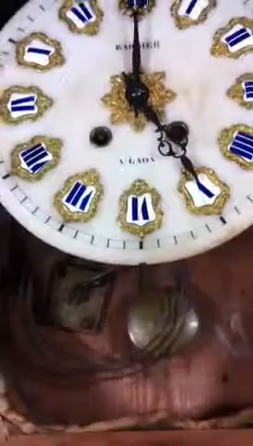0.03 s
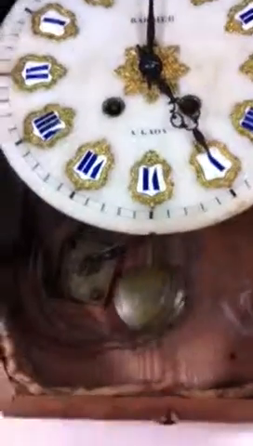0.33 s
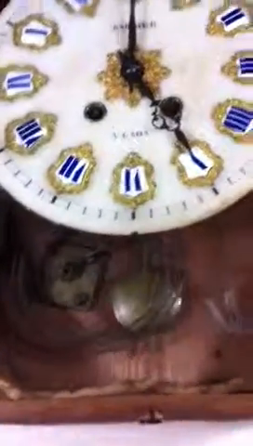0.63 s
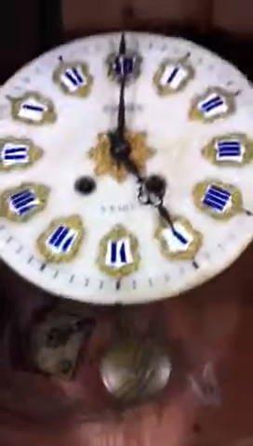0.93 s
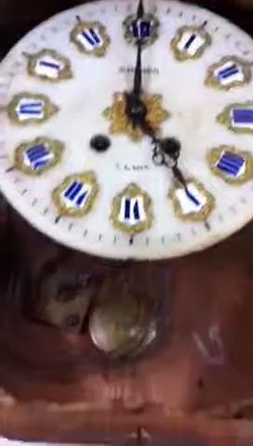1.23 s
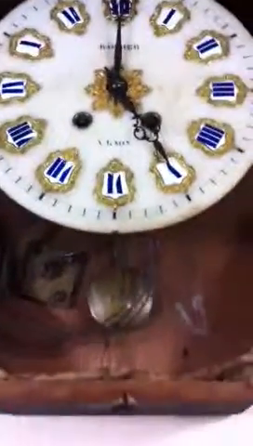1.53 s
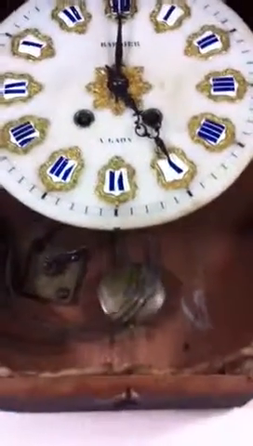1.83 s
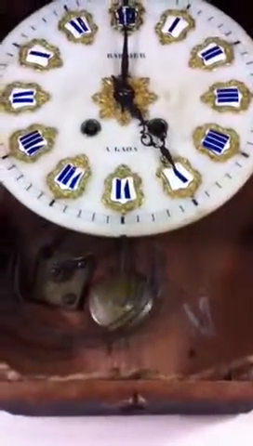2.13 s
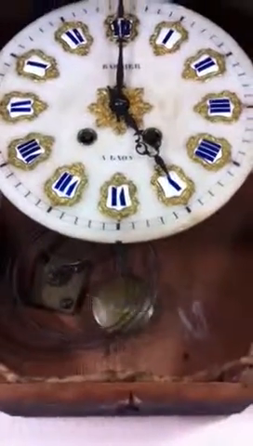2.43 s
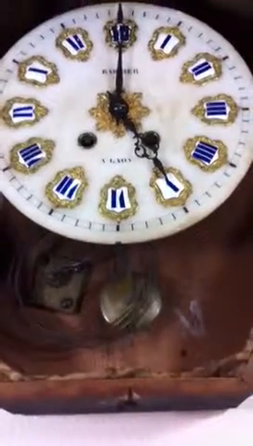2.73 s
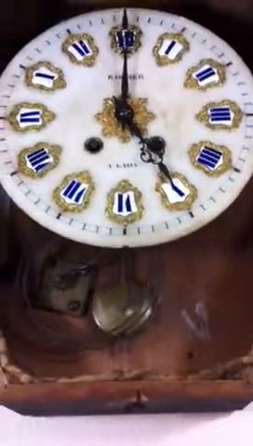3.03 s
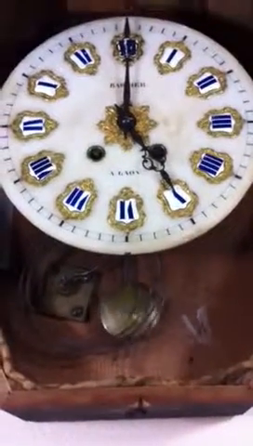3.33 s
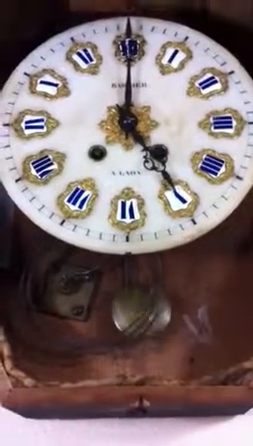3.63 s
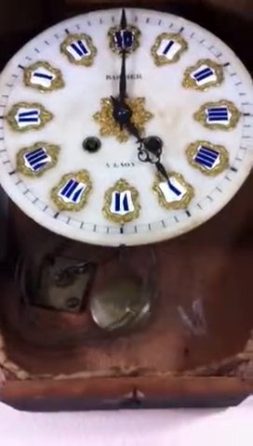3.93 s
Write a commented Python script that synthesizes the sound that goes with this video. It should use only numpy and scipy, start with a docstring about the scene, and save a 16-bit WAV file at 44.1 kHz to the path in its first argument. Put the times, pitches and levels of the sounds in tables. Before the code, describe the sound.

An antique wall clock strikes the hour close to the microphone in a quiet room. Its wire gong is already ringing, then three more evenly spaced blows land and ring on, with faint mechanism clicks between them.

```python
"""A coiled wire gong is already ringing: an antique wall clock is striking the hour in a quiet room,
close to a single microphone. Three more hammer blows land, each with a crack and a knock of the
wooden case, and the coil rings in close pairs of modes that beat. The strike train clicks faintly
between blows. Behind the clock lie a few soft rustles, a low room rumble and a hiss."""
import sys
import numpy as np
from scipy import signal
from scipy.fft import rfft, irfft
from scipy.io import wavfile

SR = 44100
rng = np.random.default_rng(int(sys.argv[2]) if len(sys.argv) > 2 else 0)


def transcribe(u):
    """Save the signal u as a 16-bit wav file named by the first command-line argument.

    u: samples, shape (n,) or (channels, n), limited to [-1, 1]; the rate is SR.
    q: integer samples, one column per channel.
    """
    v = np.clip(np.atleast_2d(u).T, -1, 1)
    q = np.round(v * 32767).astype(np.int16)
    wavfile.write(sys.argv[1], SR, q)


N = 176400
T = np.arange(N) / SR

# spectra of the room's rumble and hiss: f/Hz, relative level/dB
RUMBLE_SPECTRUM = [(25,-42),(45,-42),(62,-33),(80,-20),(100,-7),(122,0),(148,-1),(168,-12),(210,-18),(400,-30),(1000,-60)]
HISS_SPECTRUM = [(60,-30),(200,-1),(450,1),(800,-2),(1200,-5),(2000,-13.5),(3200,-18.5),(6000,-21),(9000,-23),(11000,-22.5),(12700,-18.5),(14000,-23),(15700,-23.5)]
RUMBLE_DB, RUMBLE_WAVER_DB, HISS_DB = -57.8, .8, -58.5
# spectrum of a faint hiss that swells with each blow and fades: f/Hz, relative level/dB
BLOW_HISS_SPECTRUM = [(300,-12),(900,0),(1700,-2),(2400,-8),(3100,-10),(3800,-19),(6000,-21),(10500,-28),(12600,-17),(14500,-28)]
BLOW_HISS_DB, BLOW_HISS_T60_S = -57, 2.6
# soft rustles and dull bumps: middle t/s, half length/s, centre f/Hz, level/dB
RUSTLE_SWELLS = [(.01,.05,4700,-67),(.27,.08,5300,-70),(.15,.12,450,-57),(.08,.12,1800,-65),(1.64,.05,520,-56),(1.62,.07,2300,-66),
                 (1.73,.08,135,-53),(3.33,.04,140,-53),(3.80,.03,2000,-67)]
RUSTLE_OCTAVES, RUSTLE_SKIRT_DB = .25, 8  # half width; extra fall one octave out

# clicks of the strike train and escapement: t/s, body level/dB, metal level/dB, metal t60/s
TRAIN_CLICKS = [(.392,-53,-68,.05),(.792,-40.5,-53,.055),(.875,-53,-69,.06),(1.026,-57,-66,.06),(1.80,-56,-65,.05),(2.095,-61,-71,.06),
                (2.415,-45,-58.5,.2),(2.508,-46,-61.5,.06),(3.552,-62,-69,.15),(3.992,-47,-54,.06)]
# spectra of a click's hollow body and metallic edge: f/Hz, relative level/dB
CLICK_BODY_SPECTRUM = [(300,-25),(750,-14),(900,-4),(1110,0),(1250,-14),(2200,-20),(3500,-35)]
CLICK_METAL_SPECTRUM = [(2000,-12),(3800,-9),(4900,-2),(5400,-3),(5850,7),(6500,-5),(8000,-9),(10000,-6),(15500,-12)]
CLICK_BODY_T60_S, CLICK_ATTACK_S = .13, .002

# hammer blows: t/s, gain/dB, treble gain/dB, then gain/dB in each of ZONES_HZ, set by the contact point
HAMMER_BLOWS = [(-1.0, -1.5, 5, 6.5, 11, -9, -7), (.691, -.3, 4, 3, 3.5, -2.5, -5),
                (2.328, .3, -3, -4, -4.5, 2, 7), (3.890, -.5, -.5, -4.5, -5, 3, -1)]
ZONES_HZ, ZONE_OCTAVES = (755, 1072, 1230, 2850), .08
TREBLE_FROM_HZ, TREBLE_FULL_HZ = 1950, 2150
CONTACT_S = .006  # the hammer stops the old ring as it starts the new
# spectrum of the hammer's metallic crack: f/Hz, relative level/dB
CRACK_SPECTRUM = [(800,-10),(2000,0),(3200,-2),(3550,-6),(3780,4),(4000,1),(4250,-8),(6000,-4),(7000,-7),(9500,-13),(12000,-8),(13500,-14),(15500,-18)]
CRACK_DB, CRACK_HOLD_S, CRACK_T60_S = -47, .006, .045
# spectrum of the wooden case under a blow: f/Hz, relative level/dB
CASE_SPECTRUM = [(100,-32),(220,-11),(400,-4),(540,1),(720,-5),(900,4),(1000,-3),(1120,-2),(1250,-6),(1500,-3),(1850,-6),(2150,-13),(3000,-19),(4500,-33),(9000,-45)]
CASE_DB, CASE_T60_S = -36.8, .12
ROOM_DB, ROOM_T60_S = -49, .7  # the same knock lingering in case and room

# modes of the coil: f/Hz, level/dB before the blow's gains, t60/s
COIL_MODES = [(147.8,-54,9),(180.2,-56,8.8),(186.9,-57,12),(234.2,-54,2.7),(289.5,-49.5,7),(342.5,-61,5),(352.4,-55,3),(412.5,-50.5,6.6),
              (488,-45.5,6.5),(499.1,-50,1.8),(569.1,-44.5,3.1),(580.7,-46,3.8),(655.6,-39,2.7),(668.2,-50.3,6.1),(747.4,-49.7,5.6),(761.1,-57,4.7),
              (844,-52.5,9),(858.8,-50,7.1),(946.3,-58,9),(962.8,-37.8,7.3),(1054.8,-59,8),(1071.9,-48.5,5.4),(1167,-53,8),(1186,-49.5,10),
              (1283.6,-41,4),(1304.6,-45.3,3.5),(1407.1,-35.5,1.35),(1428.8,-45.5,6.9),(1533.7,-45,2.9),(1558.5,-49.6,7.2),(1665.1,-46.5,3.4),
              (1692.7,-53.5,5.9),(1800,-61.5,2.4),(1830.2,-61,4.4),(1940.5,-51,2.7),(1973.7,-55.5,5.4),(2086.4,-59.5,1.9),(2123,-55,2.9),(2237.8,-61,2.2),
              (2277.5,-64,4.2),(2394.4,-61,1.9),(2437.1,-60,3.5),(2554.7,-54,1.7),(2600.8,-57.5,2.5),(2718.9,-59,1.1),(2768.5,-58,1.8),
              (2887,-61,1),(2939.8,-63,2.2),(3115.9,-58,1.45),(3296,-65,.7),(4480,-70,.8)]
ZING_FROM_HZ, ZING_STEP_HZ, ZING_DB, ZING_FALL_DB_PER_MODE, ZING_T60_S = 3470, 108, -69, .6, .45


def amp(db):
    """Decibels to gain."""
    return 10 ** (np.asarray(db) / 20)


def noise(spectrum):
    """Noise of rms 1, shaped by points of f/Hz, relative level/dB."""
    hz, db = np.array(spectrum).T
    bins_hz = np.maximum(np.fft.rfftfreq(N, 1 / SR), 1)
    gain = amp(np.interp(np.log(bins_hz), np.log(hz), db))
    shaped = irfft(rfft(rng.standard_normal(N)) * gain, N)
    return shaped / shaped.std()


def ramp(start, length):
    """A straight rise from 0 to 1."""
    return np.clip((T - start) / length, 0, 1)


def ring(start, attack, t60, hold=0):
    """An envelope that rises, holds, then falls 60 dB in t60 seconds."""
    return ramp(start, attack) * np.exp(-np.log(1000) * np.maximum(T - start - attack - hold, 0) / t60)


def room_tone():
    """The quiet room behind the clock: a wavering low rumble and a steady hiss."""
    waver = noise([(1, 0), (5, 0), (15, -40), (60, -120)])
    rumble = amp(RUMBLE_DB + RUMBLE_WAVER_DB * waver) * noise(RUMBLE_SPECTRUM)
    return rumble + amp(HISS_DB) * noise(HISS_SPECTRUM)


def hiss_after_blows():
    """A faint hiss that swells with each blow and fades."""
    envelope = sum(amp(db) * ring(start, CONTACT_S, BLOW_HISS_T60_S) for start, db, *_ in HAMMER_BLOWS)
    return amp(BLOW_HISS_DB) * noise(BLOW_HISS_SPECTRUM) * envelope


def rustles():
    """Faint swells of narrow noise, like something brushing or shifting near the microphone."""
    octaves = np.linspace(-2, 2, 41)
    shape_db = -20 * np.log10(1 + (octaves / RUSTLE_OCTAVES) ** 2) - RUSTLE_SKIRT_DB * octaves ** 2
    out = np.zeros(N)
    for middle, half_length, hz, db in RUSTLE_SWELLS:
        swell = np.exp(-((T - middle) / half_length) ** 2)
        out += amp(db) * swell * noise(np.c_[hz * 2 ** octaves, shape_db])
    return out


def strike_train():
    """Inside the clock, levers and pins drop with a hollow body and a thin metallic edge."""
    body, metal = noise(CLICK_BODY_SPECTRUM), noise(CLICK_METAL_SPECTRUM)
    out = np.zeros(N)
    for start, body_db, metal_db, metal_t60 in TRAIN_CLICKS:
        out += amp(body_db) * body * ring(start, CLICK_ATTACK_S, CLICK_BODY_T60_S)
        out += amp(metal_db) * metal * ring(start, CLICK_ATTACK_S, metal_t60)
    return out


def hammer():
    """The hammer lands with a metallic crack and a knock of the case that lingers in the room."""
    metal, wood, room = noise(CRACK_SPECTRUM), noise(CASE_SPECTRUM), noise(CASE_SPECTRUM)
    out = np.zeros(N)
    for start, blow_db, *_ in HAMMER_BLOWS:
        crack = amp(CRACK_DB) * metal * ring(start, CONTACT_S, CRACK_T60_S, CRACK_HOLD_S)
        knock = amp(CASE_DB) * wood * ring(start, CONTACT_S, CASE_T60_S)
        tail = amp(ROOM_DB) * room * ring(start, CONTACT_S, ROOM_T60_S)
        out += amp(blow_db) * (crack + knock + tail)
    return out


def coil_zing():
    """The coil's faint top modes, almost evenly spaced, die away just after each blow."""
    modes = np.arange(17)
    hz = ZING_FROM_HZ + ZING_STEP_HZ * (modes + rng.uniform(-.3, .3, len(modes)))
    gains = amp(ZING_DB - ZING_FALL_DB_PER_MODE * modes)
    phases = rng.uniform(0, 2 * np.pi, len(modes))
    tone = sum(gain * np.sin(2 * np.pi * f * T + phase) for f, gain, phase in zip(hz, gains, phases))
    envelope = sum(amp(db + treble_db) * ring(start, CONTACT_S, ZING_T60_S)
                   for start, db, treble_db, *_ in HAMMER_BLOWS)
    return tone * envelope


def coil_gong():
    """Close up, each blow sets the coil's paired modes ringing and beating until the hammer lands again."""
    hz, mode_db, t60s = np.array(COIL_MODES).T
    zones = np.exp(-.5 * (np.log2(hz[:, None] / np.array(ZONES_HZ)) / ZONE_OCTAVES) ** 2)
    treble = np.interp(hz, [TREBLE_FROM_HZ, TREBLE_FULL_HZ], [0, 1])
    ends = [start for start, *_ in HAMMER_BLOWS[1:]] + [N / SR]
    out = np.zeros(N)
    for (start, blow_db, treble_db, *zone_db), end in zip(HAMMER_BLOWS, ends):
        gate = ramp(start, CONTACT_S) * (1 - ramp(end, CONTACT_S))
        live = gate > 0
        age = T[live] - start
        gains = amp(mode_db + blow_db + treble * treble_db + zones @ np.array(zone_db))
        phases = rng.uniform(0, 2 * np.pi, len(hz))
        for f, gain, t60, phase in zip(hz, gains, t60s, phases):
            envelope = gate[live] * np.exp(-np.log(1000) * age / t60)
            out[live] += gain * envelope * np.sin(2 * np.pi * f * age + phase)
    return out


def scene():
    """The clock close to one microphone, the room behind it."""
    coil = coil_gong() + coil_zing()
    return (coil + hiss_after_blows() + hammer() + strike_train() + rustles() + room_tone())[None]


def record(dry, top_hz=15750):
    """The recorder cuts the top steeply."""
    return signal.sosfilt(signal.ellip(12, .1, 80, top_hz, fs=SR, output="sos"), dry)


dry = scene()
out = record(dry)
transcribe(out)
```